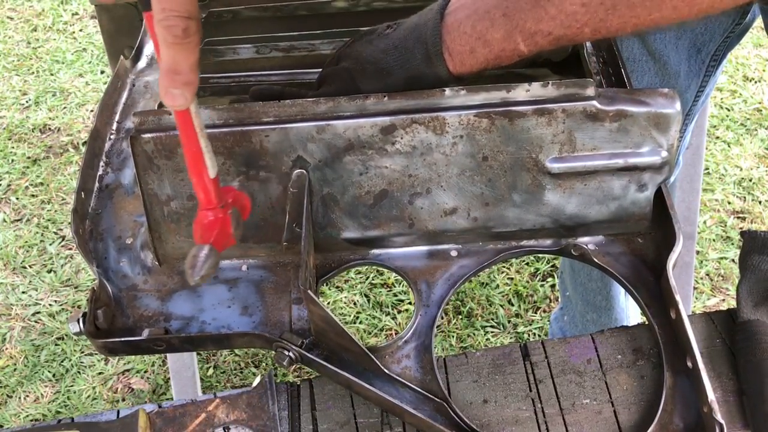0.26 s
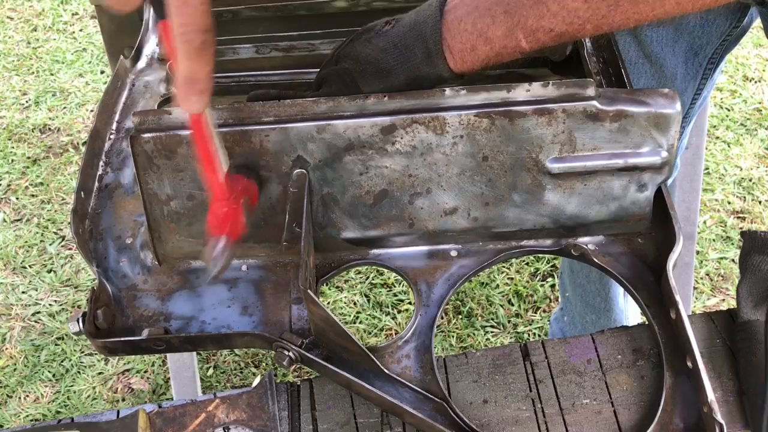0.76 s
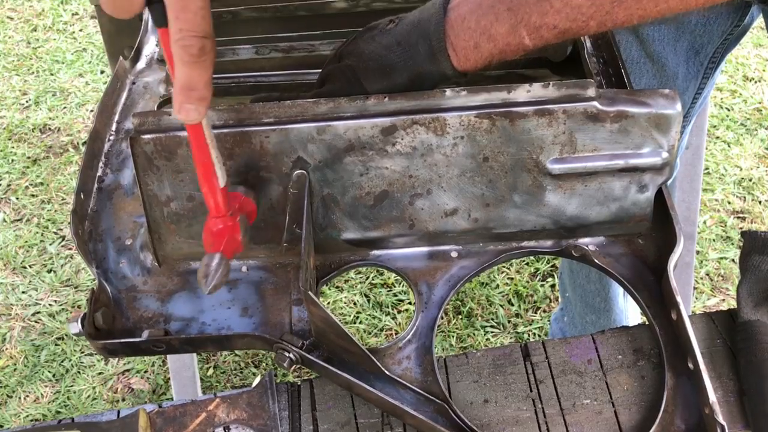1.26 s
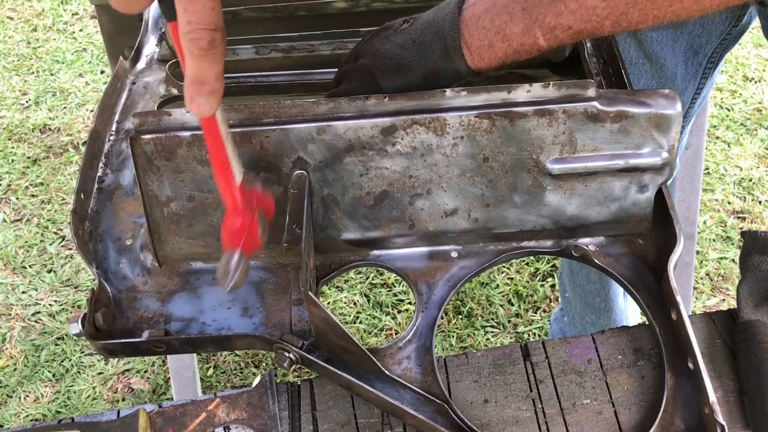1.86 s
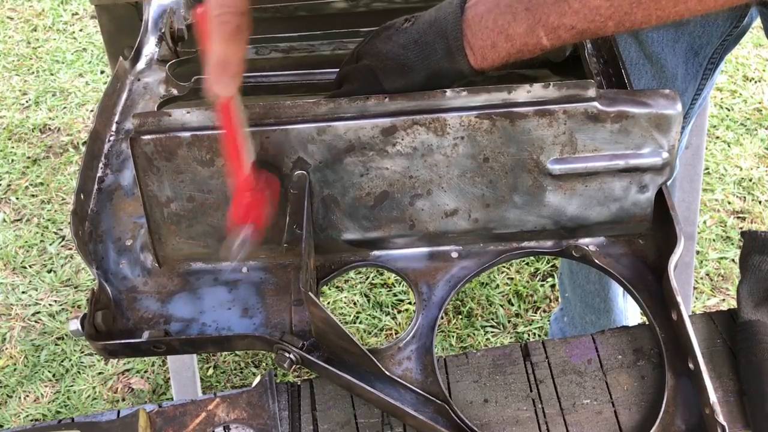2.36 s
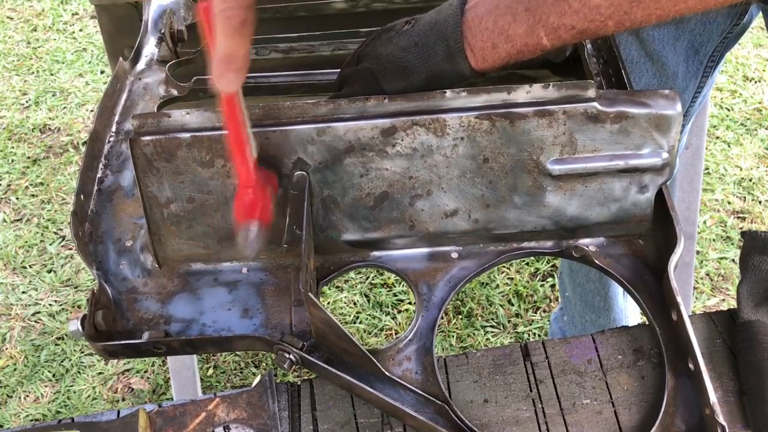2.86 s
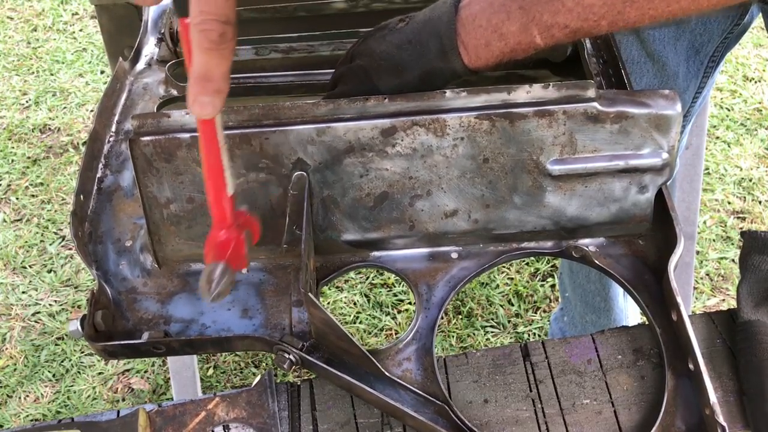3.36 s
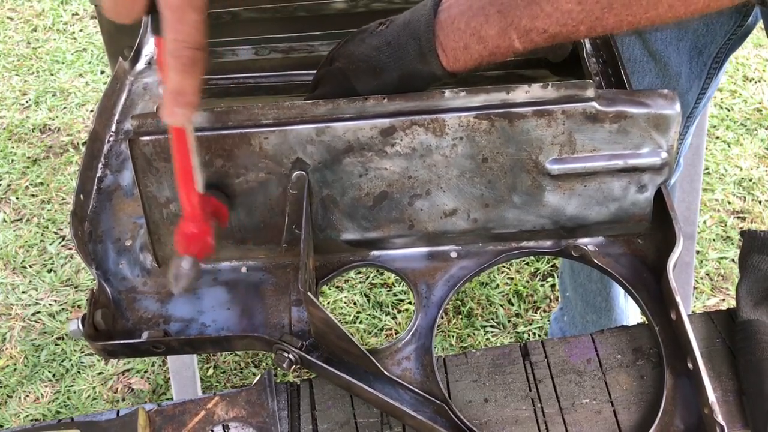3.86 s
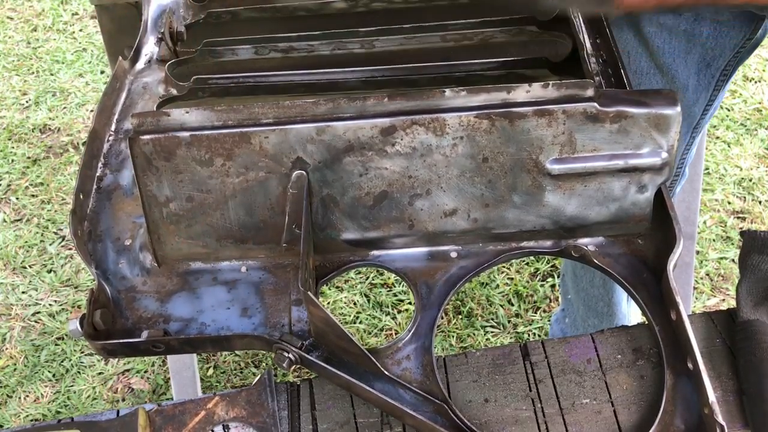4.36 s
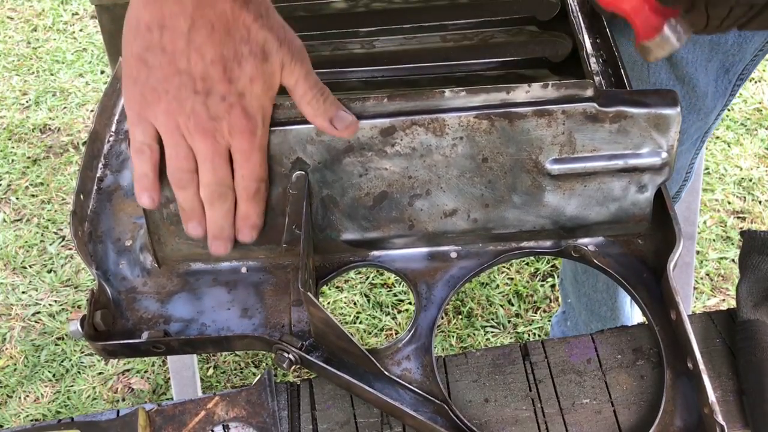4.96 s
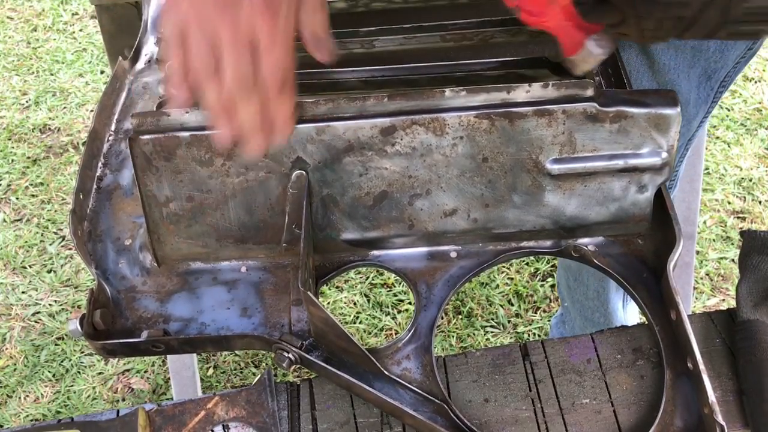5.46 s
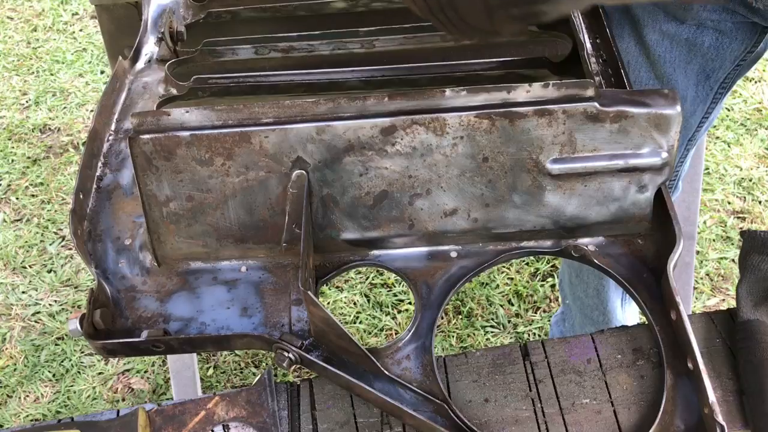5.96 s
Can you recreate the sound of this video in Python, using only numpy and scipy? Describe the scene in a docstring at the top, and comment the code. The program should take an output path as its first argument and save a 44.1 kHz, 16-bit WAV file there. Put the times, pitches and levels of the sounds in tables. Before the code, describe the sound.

A close outdoor take of panel beating. It opens on the ringing tail of a blow just struck, with a soft rustle near 0.2 s. A barely audible tap comes at 0.55, then strong clangs at 0.8 and 1.15. Very faint taps follow at 1.6 and 1.8, then loud blows at 2.1, 2.4, 2.9, 3.2, 3.55 and a somewhat weaker last one at 3.9. Each is a hard, bright, dense clang of thin steel against a dolly, fading within a few tenths of a second; the 2.4 blow is especially bright. Small rebounds rattle after several, with low dull thuds from the stand. From 4.2 there is quiet cloth and hand rustle, a distinct tool clink at 4.53 with smaller ones after, a light hand touch around 4.87, faint rubs near 5.5 and a tiny knock at 5.85. Soft hiss and distant low motor hum continue throughout.

```python
"""A hammer taps a thin steel panel backed by a hand-held dolly, outdoors.
Each blow is a dense clang of fading noise bands and minor modes, plus lasting sine modes of panel, head and dolly.
Touches of the panel against dolly, hammer or hand are more bursts of clang with a little head ring.
Below lie far hum and hiss (filtered noise), rustling grains and faint rubs; low thuds are damped sines.
Late on, tools put down and a hand landing clink: a noise knock drives one small resonance."""
import sys
import numpy as np
from scipy import signal
from scipy.io import wavfile

SR = 44100
rng = np.random.default_rng(int(sys.argv[2]) if len(sys.argv) > 2 else 0)


def persist_wave(psi):
    """Save psi, clipped to +-1, as 16-bit WAV."""
    counts = np.round(np.clip(psi, -1, 1) * 32767).astype(np.int16)
    wavfile.write(sys.argv[1], SR, np.atleast_2d(counts).T)


N = 273420   # length in samples

# In all tables, t60 is the time a sound takes to fall by 60 dB.
# Hammer blows: start_s, strength_db, decay_stretch (factor), brightness_db_per_octave, bass_db, body_db,
# panel_ring_db, head_ring_db, head_top_ring_db, along and across (landing spot, steps from the usual one)
HAMMER_BLOWS = [(-0.15, -16, 1.08, 2.5, 12, 12, 3.5, -9, -9, -0.81, 0.6),
                (0.552, -39.5, 0.67, -0.4, 14.5, -1.5, 0.1, 2, -2, 1.1, 1.5),
                (0.8179, -14, 0.91, 0.87, 3.5, -5, -1, 2.5, 10, -0.86, -0.5),
                (1.1448, -15.5, 1.005, 0.8, 2.5, -0.5, -2.5, 5, 11, 0.22, 1.1),
                (1.6123, -48.5, 0.74, -1.5, 18, 0, -4, 1, -9, 1.7, -2.8),
                (1.779, -42, 0.8, -0.8, 16.5, 2, 2, -1, -5, 1.24, 0.6),
                (2.1232, -14, 0.94, -0.63, -0.4, 1, 0.6, -0.8, 5, 0.27, 0.5),
                (2.421, -18, 0.99, 4, 12, -2, 0.3, 7.5, 22.5, -1.14, -0.15),
                (2.919, -17.5, 1.01, 0.1, -4.5, 8, -2.5, -5, 0, 0.38, 0.6),
                (3.2137, -17.5, 1.097, -0.53, -9.5, 2, -3, -0.5, 11, 0.32, -0.96),
                (3.554, -18.5, 1.03, -1.16, -4, -3, -1.3, -1, 0, 0.29, 1.8),
                (3.8764, -21.5, 1.064, -1.1, 1.5, 2, -0.8, -2.1, -6, 0.13, -2.5)]
# Frequencies at which the clang's colour is given: pitch_hz
COLOUR_HZ = [60, 150, 450, 1000, 1600, 2600, 3600, 5200, 7500, 10000, 14000]
# Clang of a usual blow at COLOUR_HZ, before radiation: level_db (rms, against the blow's strength)
COLOUR_DB = [-39, -31.5, -12, -6, -2.5, -8.5, -4, -5.5, -1.1, -9, -12.5]
# Brightness tilts the clang about TILT_HZ, and no further down than the floor in octaves
TILT_HZ, TILT_FLOOR_OCTAVES, BASS_TOP_HZ, BODY_TOP_HZ = 2000, -2.2, 250, 700
# Panel touching dolly, hammer or hand again: start_s, low_clang_db and high_clang_db (rms, before
# radiation), head_ring_db (peak)
PANEL_REBOUNDS = [(-.01, -54, -50, -56), (.849, -49, -59, -21), (2.186, -29.5, -32.5, -38),
                  (2.212, -37, -33, -51), (2.235, -37, -36.5, -52.5), (2.466, -32, -48, -17.5),
                  (2.528, -42.5, -37.5, -43), (3.228, -37, -31.5, -51), (3.34, -56, -49, -71),
                  (3.622, -41, -33.5, -39.5), (3.947, -43.5, -36.5, -64), (4.846, -56, -69.5, -75),
                  (4.871, -65.5, -76, -59.5)]
# Fading of the clang, before each contact's stretch: pitch_hz, t60_s
CLANG_T60 = [(100, 0.86), (260, 0.28), (700, 0.29), (1840, 0.28), (4850, 0.23), (12800, 0.11)]
CRACK_DB, CRACK_T60_S = 6.5, 0.017   # extra clang while the blow is still spreading
# How well the sheet radiates its close modes: pitch_hz, level_db
RADIATION = [(100, -2.5), (200, 2), (270, -8), (380, 2.5), (600, 4), (900, 0), (1400, -0.5), (1950, -5),
             (2600, 5), (4200, -3.5), (5100, 1.5), (9500, 0)]
# Minor panel modes: count, highest pitch, level against the hissy clang before their random sizes
CLOSE_MODES, CLOSE_TOP_HZ, CLOSE_DB = 160, 5262, -4
# Lasting panel modes, before random detuning: pitch_hz
PANEL_HZ = [153, 212, 226, 291, 351, 409, 430, 487, 563, 650, 675, 706, 910, 926, 1087, 1176, 1345, 1497,
            1985, 2115, 2421, 2488, 2534, 2569, 2840, 3312, 3389, 3812, 5010, 8365]
# Fading of the modes at PANEL_HZ, before each blow's stretch: t60_s
PANEL_T60_S = [1.2, .5, .5, 1.5, 0.44, .4, .38, .4, .7, .3, .25, 0.6, .33, .35, .25, .25, .25, .22, 0.24,
               .15, .6, 0.59, .2, .45, .22, .18, .18, .25, .33, .14]
# Drive of the modes at PANEL_HZ, before they waver: level_db (peak, against the blow's strength),
# along_db and across_db (dB per step of the landing spot)
PANEL_DRIVE = [(-23, 0.5, -2.5), (-19.5, 5, -5), (-18.5, 3, -4.5), (-29, 7, -2.3), (-14.5, 5.5, -2.7),
               (-6, 2.4, -1.5), (-6.5, 2.5, -1.46), (-8.5, 1.5, -1.5), (-17, 5, -0.6), (-12, 1.55, -4),
               (-8, 0.8, 1), (-16, 7.5, -0.5), (-7, 3.1, 3.5), (-9.5, 2.5, -4.5), (-15.5, 0.85, 1.5),
               (-18, -2, -2.6), (-6, 2.5, 3), (-4, 1.4, -1.5), (-14, -1.7, -2.4), (-9, -3.37, 3),
               (-15.5, -7.5, -1.36), (-10, -0.5, -0.4), (-6, -6, 4), (-12, 0.9, -2.4), (-6, -1.55, -1),
               (-6, 1.1, 4.0), (-9.5, -8, -4), (-11, 1.35, -2), (-17.5, -0.9, -0.5), (-9, -6, -2.5)]
# Modes of hammer head and dolly, before random detuning: pitch_hz
STEEL_HZ = [5110, 5385, 5850, 6500, 7720, 10980, 11240]
# Fading of the modes at STEEL_HZ: t60_s
STEEL_T60_S = [.08, 0.13, 0.093, 0.09, 0.098, 0.16, 0.079]
# Modes at STEEL_HZ, before they waver: level_db (peak, against the blow's strength)
STEEL_DB = [3, -7.5, -8.5, -6, -2.5, -20.5, -15]
# Hiss and rumble, only the balance between pitches: pitch_hz, level_db (per Hz)
HISS_COLOUR = [(25, -9.5), (55, 1), (120, -6.5), (200, -11.5), (500, -15.5), (1000, -20.5), (2000, -24),
               (5000, -24), (15500, -27)]
HISS_DB = -57.5   # rms of the whole hiss
# Far motor: pitch_hz, width_hz, level_db (rms)
MOTOR_HUM = [(56, 6.7, -72.5), (121, 5, -61), (233.1, 6, -82), (286, 3, -73)]
# Level curve of cloth and hands: time_s, level_db (rms)
RUSTLE_CURVE = [(0, -70), (.12, -70), (.19, -49.5), (.26, -71.5), (4.099, -70), (4.2, -66), (4.348, -67),
                (4.5, -60.5), (4.67, -61), (4.72, -83.5), (4.83, -85), (4.86, -67.5), (4.95, -69),
                (5.15, -66), (5.4, -76.5), (6.2, -71.5)]
# Faint treble rubs, as of skin or cloth on steel: middle_s, spread_s (of a bell-shaped swell),
# level_db (rms of the narrow part at the middle)
TREBLE_RUBS = [(0.175, .03, -63), (5.491, 0.026, -68.5), (5.57, .015, -72)]
RUB_HZ, RUB_WIDTH_HZ, RUB_BROAD_DB = 7500, 700, -1   # broad part against the narrow peak
# The stand rocks under the blows: start_s, level_db (size of the sine before it fades), t60_s
STAND_THUDS = [(0.851, -39, .12), (1.18, -41, 0.26), (2.15, -38.5, 0.28), (2.44, -35, 0.15),
               (3.25, -43.5, 0.093), (3.621, -38, 0.21), (3.877, -33, .08), (3.93, -34, 0.11)]
STAND_HZ = 106
# Tools set down and a hand landing on the panel: start_s, ring_hz, ring_width_hz, ring_db (peak),
# knock_top_hz, knock_db (noise at its start, before filtering), knock_t60_s
TOOL_CLINKS = [(4.5323, 2605, 110, -30.5, 2120, -17.5, 0.016),
               (4.5896, 4970, 120.5, -43.5, 3230, -23, 0.025), (4.6175, 2600, 200, -54, 2500, -28, 0.0094),
               (4.8692, 2940, 250, -40, 12100, -45.5, 0.1), (4.89, 2600, 150, -48, 4990, -59, 0.18),
               (4.877, 5100, 50.2, -57.5, 1800, -60, 0.055), (5.845, 897, 200.5, -56, 2480, -54, 0.04)]
OFFSET, CLIP = -.1498, .97   # the converter's resting value and limit, full scale = 1
STOP_HZ = 15955   # 40 dB down from here up
EDGES_HZ = 25 * 2 ** np.arange(0, 9.4, 1 / 3)   # third-octave band edges
SINCE = np.arange(int(1.2 * SR)) / SR   # seconds since a contact


def from_db(db):
    """Turn dB into an amplitude factor."""
    return 10 ** (np.asarray(db) / 20)


def at_hz(points, hz):
    """Read (Hz, value) points on a log-frequency axis."""
    points = np.array(points)
    return np.interp(np.log(hz), np.log(points[:, 0]), points[:, 1])


def add(out, sound, s):
    """Mix a sound in from time s on; s may lie before the start."""
    start = round(s * SR)
    part = sound[max(-start, 0):N - start]
    first = max(start, 0)
    out[first:first + len(part)] += part


def fading(t60):
    """Fall 60 dB in t60 seconds."""
    return np.exp(-np.log(1000) * SINCE / t60)


def bandpass(x, order, low, high):
    """Keep what lies between low and high Hz."""
    return signal.sosfilt(signal.butter(order, [low, high], "band", fs=SR, output="sos"), x)


def resonance(x, hz, width):
    """A two-pole resonance with gain 1 on top."""
    r = np.exp(-np.pi * width / SR)
    feedback = [1, -2 * r * np.cos(2 * np.pi * hz / SR), r * r]
    return signal.lfilter([(1 - r * r) / 2, 0, (r * r - 1) / 2], feedback, x)


def noise_bands():
    """Third-octave bands of noise, rms 1 each, with their centre frequencies and widths."""
    white = rng.standard_normal((2, N))
    for k, (low, high) in enumerate(zip(EDGES_HZ, EDGES_HZ[1:])):
        band = bandpass(white[k % 2], 2, low, high)   # neighbours use different noise
        yield np.sqrt(low * high), high - low, band / band.std()


def blows():
    """Time, stretch and levels of each blow: hard contact tilts the clang up, the spot sets each mode's drive."""
    hz = np.array(COLOUR_HZ)
    octaves = np.maximum(np.log2(hz / TILT_HZ), TILT_FLOOR_OCTAVES)
    bass = hz < BASS_TOP_HZ
    body = (hz > BASS_TOP_HZ) & (hz < BODY_TOP_HZ)
    top = np.array(STEEL_HZ) > 10000
    for (s, strength_db, stretch, tilt_db, bass_db, body_db,
         ring_db, head_db, top_db, along, across) in HAMMER_BLOWS:
        colour_db = strength_db + np.array(COLOUR_DB) + tilt_db * octaves + bass_db * bass + body_db * body
        steel_db = strength_db + np.array(STEEL_DB) + np.where(top, top_db, head_db)
        panel_db = strength_db + ring_db + np.array(PANEL_DRIVE) @ [1, along, across]
        yield s, stretch, colour_db, steel_db, panel_db


def clang():
    """The countless close modes of the sheet: noise bands, each fading at its own rate after every contact."""
    out = np.zeros(N)
    for hz, width, band in noise_bands():
        power = np.zeros(N)
        t60 = at_hz(CLANG_T60, hz)
        rise = 1 - np.exp(-SINCE * hz / 2.2)   # low bands take longer to build up
        for s, stretch, colour_db, steel_db, panel_db in blows():
            level = from_db(at_hz(list(zip(COLOUR_HZ, colour_db)), hz))
            shape = fading(t60 * stretch) + from_db(CRACK_DB) * fading(CRACK_T60_S)
            add(power, (level * rise * shape) ** 2, s)
        for s, low_db, high_db, head_db in PANEL_REBOUNDS:
            colour = [(60, low_db - 34), (600, low_db), (6000, high_db), (15000, high_db - 15)]
            level = from_db(at_hz(colour, hz))
            add(power, (level * rise * fading(0.84 * t60)) ** 2, s)
        out += from_db(at_hz(RADIATION, hz)) * band * np.sqrt(power)
    return out


def close_modes():
    """Minor modes evenly strewn in frequency, as in a flat plate; every blow drives each one differently."""
    out = np.zeros(N)
    hz = rng.uniform(300, CLOSE_TOP_HZ, CLOSE_MODES)
    since = SINCE[:SR // 2]
    waves = np.sin(2 * np.pi * hz[:, None] * since)
    t60 = at_hz(CLANG_T60, hz) * rng.uniform(0.094, 1.454, CLOSE_MODES)
    per_band = hz * CLOSE_MODES / CLOSE_TOP_HZ / 8   # modes sharing the power of one noise band
    for s, stretch, colour_db, steel_db, panel_db in blows():
        blow_db = at_hz(list(zip(COLOUR_HZ, colour_db)), hz)
        level = from_db(CLOSE_DB + at_hz(RADIATION, hz) + blow_db)
        size = level * rng.standard_normal(CLOSE_MODES) / np.sqrt(per_band)
        fade = np.exp(-np.log(1000) * since / (stretch * t60[:, None]))
        add(out, size @ (waves * fade), s)
    return out


def modes(hz, db, t60):
    """Struck modes with random signs; the shifting grip on the dolly makes each one waver."""
    hz, t60 = np.array(hz)[:, None], np.array(t60)[:, None]
    knots = rng.standard_normal((2 * len(hz), 61))
    knot_s = np.linspace(0, SINCE[-1], 61)
    waver = np.array([np.interp(SINCE, knot_s, k) for k in knots])
    level_waver, phase_waver = waver[::2], waver[1::2]
    hz = hz + 2.5 / t60 * rng.standard_normal(hz.shape)   # modes that the grip damps most are also detuned most
    phase = 2 * np.pi * hz * SINCE + 0.34 / t60 * (phase_waver - phase_waver[:, :1])
    waves = fading(t60) * from_db(3.3 * level_waver) * np.sin(phase)
    return (from_db(db) * rng.choice([-1, 1], len(hz))) @ waves


def rings():
    """Lasting modes of panel, hammer head and dolly, set off by each contact."""
    out = np.zeros(N)
    for s, stretch, colour_db, steel_db, panel_db in blows():
        add(out, modes(PANEL_HZ, panel_db, np.array(PANEL_T60_S) * stretch), s)
        add(out, modes(STEEL_HZ, steel_db, STEEL_T60_S), s)
    for s, low_db, high_db, head_db in PANEL_REBOUNDS:   # a rebound wakes the two top modes of the head
        add(out, modes(STEEL_HZ[-2:], [head_db, head_db - 5.5], STEEL_T60_S[-2:]), s)
    return out


def background():
    """Steady hiss and outdoor rumble, plus wavering hum lines from noise in narrow resonances."""
    hiss = np.zeros(N)
    for hz, width, band in noise_bands():
        hiss += from_db(at_hz(HISS_COLOUR, hz)) * np.sqrt(width) * band
    out = from_db(HISS_DB) * hiss / hiss.std()
    for hz, width, db in MOTOR_HUM:
        line = resonance(rng.standard_normal(N), hz, width)
        out += from_db(db) * line / line.std()
    return out


def rustle():
    """Cloth and hands: dense uneven grains, dull, under the level curve."""
    sparse = rng.standard_normal(N) * (rng.random(N) < 2500 / SR)   # about 2500 grains a second
    grains = sparse * from_db(2.5 * np.minimum(rng.exponential(1, N), 3))
    dull = bandpass(grains, 3, 350, 1650)
    s, db = np.transpose(RUSTLE_CURVE)
    return from_db(np.interp(np.arange(N) / SR, s, db)) * dull / dull.std()


def rubs():
    """Soft swells of bright noise with one broad peak."""
    white = rng.standard_normal(N)
    peak = resonance(white, RUB_HZ, RUB_WIDTH_HZ)
    broad = bandpass(white, 2, 2500, 11000)
    time = np.arange(N) / SR
    swell = np.zeros(N)
    for middle, spread, db in TREBLE_RUBS:
        swell += from_db(db) * np.exp(-.5 * ((time - middle) / spread) ** 2)
    return swell * (peak / peak.std() + from_db(RUB_BROAD_DB) * broad / broad.std())


def thuds():
    """The stand rocks: one low, quickly damped swing each."""
    out = np.zeros(N)
    for s, db, t60 in STAND_THUDS:
        add(out, from_db(db) * fading(t60) * np.sin(2 * np.pi * STAND_HZ * SINCE), s)
    return out


def clinks():
    """A short knock of noise, which also drives one small resonance."""
    out = np.zeros(N)
    for s, hz, width, ring_db, top_hz, knock_db, t60 in TOOL_CLINKS:
        burst = rng.standard_normal(len(SINCE)) * fading(t60) + 1e-18   # avoids vanishingly small numbers
        knock = bandpass(burst, 2, 350, top_hz)
        ring = resonance(burst, hz, width)
        add(out, from_db(knock_db) * knock + from_db(ring_db) * ring / abs(ring).max(), s)
    return out


def scene():
    """Panel work over the outdoor floor, as one channel."""
    blows_heard = clang() + close_modes() + rings()
    floor = background() + rustle() + rubs()
    return (blows_heard + floor + thuds() + clinks())[None]


def record(dry):
    """The converter sits off centre and clips near full scale; the top is cut."""
    clipped = np.clip(dry + OFFSET, -CLIP, CLIP) - OFFSET
    steep = signal.cheby2(24, 40, STOP_HZ, fs=SR, output="sos")
    return OFFSET + signal.sosfilt(steep, clipped)


dry = scene()
out = record(dry)
persist_wave(out)
```